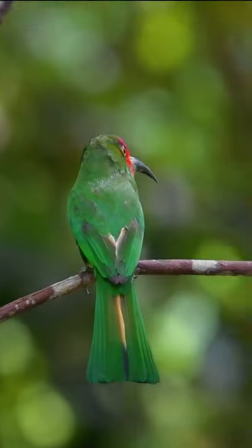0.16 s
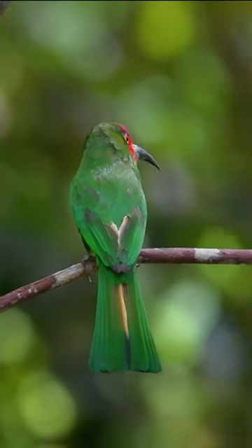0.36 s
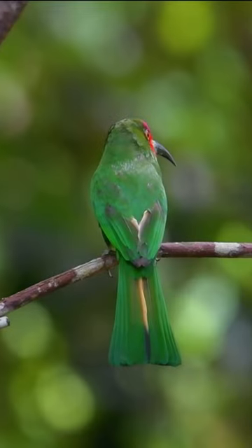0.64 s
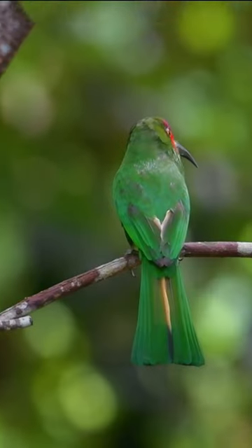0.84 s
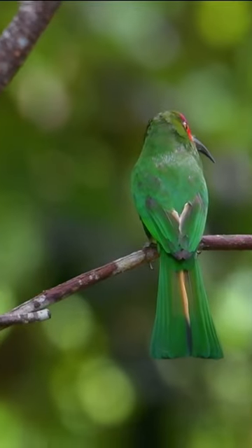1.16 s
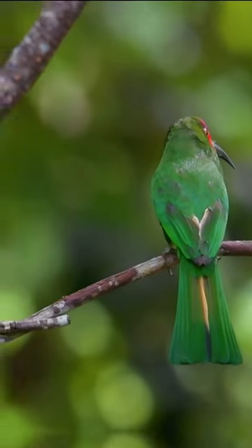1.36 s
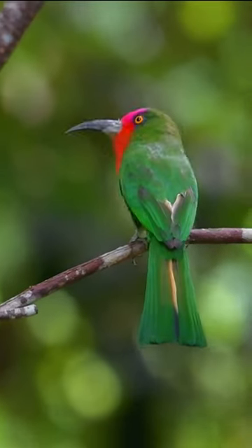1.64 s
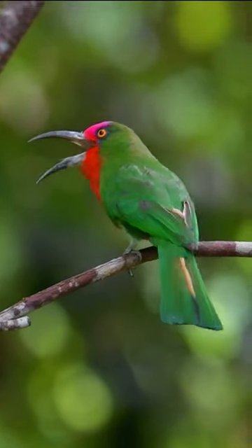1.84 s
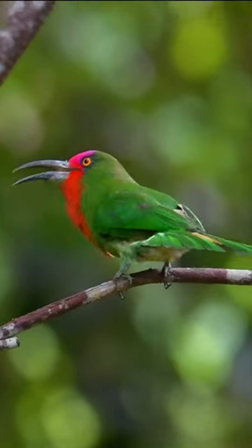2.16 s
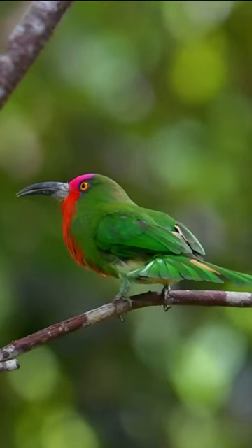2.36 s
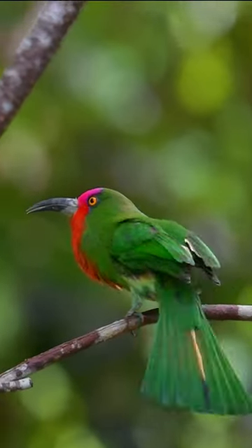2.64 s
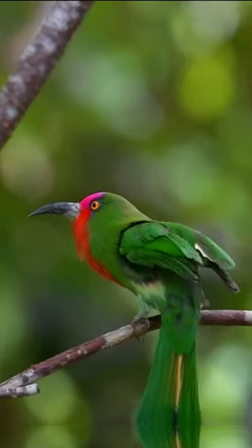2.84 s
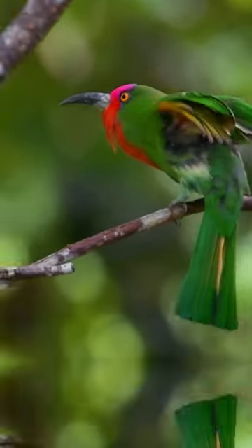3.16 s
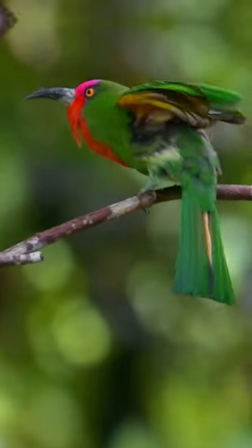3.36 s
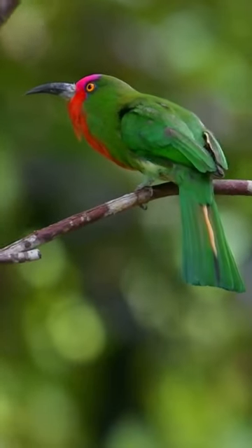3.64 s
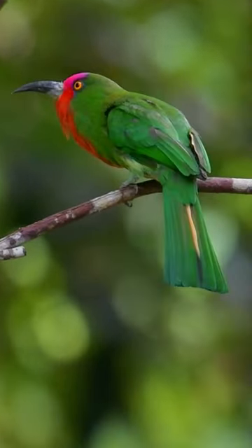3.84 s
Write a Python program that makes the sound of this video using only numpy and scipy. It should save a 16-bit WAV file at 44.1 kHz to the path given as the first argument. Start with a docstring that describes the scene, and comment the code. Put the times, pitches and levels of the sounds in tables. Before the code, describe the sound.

Silence until 0.24 s, then cicada hiss and a thin, phrased whine start abruptly, with rapid high cricket chirps over faint low rumble. An insect buzz swells around 1.5 s, fading by 2.3. From 1.87 to 2.38 s a close bird rattles six harsh, dry notes, falling and dulling, then three low purring croaks trailing off by 2.8. Soft hollow knock at 3.0; insects continue to the end.

```python
"""Out of a short silence, cicadas cut in at full level: bands of hiss plus one nearer, narrow whine in phrases.
A low rumble lies beneath, a cricket chirps as swept sine tones, and a comb of sines makes a passing insect buzz.
A bee-eater on a forest branch rattles six dry, falling notes that darken as its bill closes, then three low
purring croaks, the last with a long fading tail: pulses ringing throat resonances, with forest echoes. The
cricket's upper sideband enters as a thin noise tone, and a small knock is two damped sines. Two narrow notches
hollow out the mix."""
import sys
import numpy as np
from scipy import signal
from scipy.fft import rfft, irfft, next_fast_len
from scipy.io import wavfile
from scipy.ndimage import uniform_filter1d, map_coordinates

SR = 44100
rng = np.random.default_rng(int(sys.argv[2]) if len(sys.argv) > 2 else 0)


def put_to_file(sound):
    """Save the sound as 16-bit audio at rate SR, in the file named by the first command-line argument."""
    columns = np.atleast_2d(sound).T  # one column per channel
    safe = np.clip(columns, -1, 1)
    whole_steps = np.round(safe * 32767)
    wavfile.write(sys.argv[1], SR, whole_steps.astype(np.int16))


N = 176400


def amp(db):
    """Decibels to linear gain."""
    return 10 ** (np.asarray(db) / 20)


def unit(x):
    """Scale a signal to rms 1."""
    return x / np.sqrt(np.mean(x ** 2) + 1e-20)


def along(points, hz):
    """Read (Hz, value) points at any frequency, on a log frequency axis."""
    point_hz, values = np.transpose(points)
    return np.interp(np.log(hz + 1), np.log(point_hz + 1), values)


def curve(rows):
    """Draw an automation curve through (s, value) points, one value per sample."""
    return np.interp(np.arange(N) / SR, *np.transpose(rows))


def wobble(rate):
    """Smooth random modulation: a spline through random knots, rate knots a second."""
    knots = rng.standard_normal(int(N * rate / SR) + 4)
    return map_coordinates(knots, [np.arange(N) * rate / SR])


def filtered(x, response):
    """Shape a sound's spectrum with a response that is a function of frequency."""
    m = next_fast_len(N + SR // 2)
    return irfft(rfft(x, m) * response(np.fft.rfftfreq(m, 1 / SR)), m)[..., :N]


def pan(db):
    """Left and right gains for a level difference; positive leans left."""
    return amp(np.array([[db], [-db]]) / 2)


def add(track, s, sound):
    """Mix a sound into a track at a time in seconds."""
    i = round(s * SR)
    track[i:i + len(sound)] += sound


def noise(spectrum):
    """Two unrelated noises of one colour, silent outside the range of its (Hz, dB) points."""
    def colour(hz):
        inside = (hz > spectrum[0][0]) & (hz < spectrum[-1][0])
        return amp(along(spectrum, hz)) * inside
    return unit(filtered(rng.standard_normal((2, N)), colour))


def stereo(pair, alike):
    """Blend two unrelated signals to a left-right likeness that varies with frequency."""
    def mid_side_gains(hz):
        turn = np.arccos(np.clip(along(alike, hz), -1, 1)) / 2
        return np.array([np.cos(turn), np.sin(turn)])
    mid, side = filtered(pair, mid_side_gains)
    return np.array([mid + side, mid - side])


def forest(x):
    """Diffuse echo of the trees: noise decaying at its own pace in each band, different at each ear."""
    # decay time by frequency: frequency_hz, t60_s
    decay_times = [(300, 0.61), (1000, 0.27), (3300, 0.7), (7000, 0.52), (12000, 0.45)]
    hz, t, grains = signal.stft(rng.standard_normal((2, SR)), SR, nperseg=256)
    decay = amp(-60 * t / along(decay_times, hz)[:, None])
    onset = 1 - np.exp(-t / 0.004)
    tail = signal.istft(grains * decay * onset, SR, nperseg=256)[1]
    return signal.fftconvolve(x[None], tail / np.linalg.norm(tail[0]), axes=1)[:, :N]


def trunks(x, count=14):
    """Early copies from nearby branches and trunks, 1 to 18 ms late and of random sign."""
    taps = np.zeros((2, SR // 10))
    for side in taps:
        delays = (rng.uniform(.001, .018, count) * SR).astype(int)
        side[delays] = rng.choice([-1, 1], count)
    return signal.fftconvolve(x[None], taps / np.linalg.norm(taps, axis=1, keepdims=True), axes=1)[:, :N]


def cicadas():
    """Two fluttering hiss bands of chorus, one nearer singer and thin noise tones."""
    # chorus spectra: frequency_hz, relative_level_db
    low_spectrum = [(4900, -33), (5250, -11.5), (5520, -1), (5800, 4), (6050, -6), (6300, -6.5),
                    (6600, -36)]
    high_spectrum = [(6000, -36), (6400, -12.5), (6800, -1.5), (7050, 2), (7300, -4.5), (7900, -14),
                     (8450, -12), (9000, -25), (9900, -27.5), (11000, -38), (13000, -49), (14100, -26),
                     (15000, -44)]
    # thin tones, the cricket's lower sideband near 4050 Hz, then far insects: pitch_hz, width_hz, level_db
    thin_tones = [(4050, 69, -74.5), (5514, 40, -64.5), (6085, 25, -62), (8070, 46, -68), (8447, 110, -67),
                  (8800, 60, -74), (9160, 43, -75)]
    low_db, high_db, flutter_db = -55, -49, 1
    low = amp(low_db + flutter_db * wobble(250)) * noise(low_spectrum)
    high = amp(high_db + flutter_db * wobble(300) + 0.47 * wobble(2.84)) * noise(high_spectrum)
    tones = np.zeros((2, N))
    for hz, width, db in thin_tones:
        tone = noise([(hz - 2 * width, -30), (hz, 0), (hz + 2 * width, -30)])
        tones += amp(db + 0.81 * wobble(2.41)) * tone
    return low * pan(db=-4.5) + high * pan(db=1.0) + near_cicada() + tones * pan(db=-7.5)


def near_cicada():
    """A narrow, rough whine of noise on a carrier; every phrase scoops up to its pitch, holds and fades."""
    # phrases: start_s, end_s, level_db
    phrases = [(-.2, 1.106, -52.5), (1.638, 3.1, -52.5), (3.42, 4.4, -51.5)]
    pitch_hz, width_hz = 5856, 90
    scoop_hz, scoop_s, fade_s = 341.1, 0.15, 0.21
    t = np.arange(N) / SR
    out = np.zeros((2, N))
    for start, end, db in phrases:
        hz = pitch_hz - scoop_hz * np.exp(-np.maximum(t - start, 0) / scoop_s)
        phase = 2 * np.pi * np.cumsum(hz) / SR
        # slow noises on cosine and sine make a narrow band around the gliding pitch
        white = rng.standard_normal((2, 2, N))
        a, b = unit(filtered(white, lambda f: 1 / (1 + (f / width_hz) ** 2)))
        swell = np.clip(np.minimum(t - start, end - t) / fade_s, 0, 1)
        out += amp(db) * swell * (a * np.cos(phase) + b * np.sin(phase))
    return out * pan(db=-3.5)


def air():
    """Distant rumble, nearly mono in the bass, and faint forest hiss, both filtered noise."""
    # rumble spectrum: frequency_hz, relative_level_db
    rumble_spectrum = [(15, -35), (25, -29), (62, -7), (104, -3.5), (218, -9.5), (300, -11), (421, -17),
                       (2210, -26), (2620, -35.5), (2970, -25), (3600, -28.5), (4000, -25.5), (5200, -23.5),
                       (8800, -120)]
    # stereo image of the rumble: frequency_hz, left_right_likeness
    likeness = [(60, 0.98), (250, 0.69), (1000, 0.12), (4000, 0.067)]
    rumble = unit(stereo(noise(rumble_spectrum), likeness))
    hiss = noise([(2800, -12.0), (3500, 1.0), (5000, 10), (6500, -18)])
    return amp(-58 + wobble(7.01)) * rumble + amp(-65) * hiss


def cricket():
    """Pure tones in runs of evenly spaced, slightly falling chirps, blurred by the trees."""
    # runs of chirps: first_s, last_s, count, first_relative_db, last_relative_db
    runs = [(.244, .469, 5, -55, -52.5), (.522, .606, 3, -51, -54.5), (.655, .765, 3, -55.5, -53),
            (.812, 1.006, 5, -54, -58.5), (1.085, 1.172, 2, -62, -62), (2.225, 2.336, 3, -58, -56),
            (2.372, 2.445, 3, -52, -55), (2.495, 2.696, 6, -54, -54), (2.738, 3.062, 9, -50, -50.5),
            (3.116, 3.501, 10, -50.5, -52), (3.543, 3.721, 5, -55, -57), (3.78, 3.99, 5, -55, -56.5)]
    pitch_hz, wander_hz, glide_hz = 4556, 6.9, 25  # wander from chirp to chirp, fall within each
    trim_db, uneven_db, echo_db = 4.5, 0.66, -10
    overlap = 1.15  # chirp length over spacing
    out = np.zeros(N + SR)
    for first, last, count, first_db, last_db in runs:
        length = overlap * (last - first) / (count - 1)
        u = np.linspace(0, 1, int(length * SR))  # progress through a chirp
        swell = np.sin(np.pi * u) ** 1.12
        for s, db in zip(np.linspace(first, last, count), np.linspace(first_db, last_db, count)):
            hz = pitch_hz + wander_hz * rng.standard_normal() + glide_hz * (.5 - u)
            tone = np.sin(2 * np.pi * (np.cumsum(hz) / SR + rng.random()))
            level = amp(db + trim_db + uneven_db * rng.standard_normal())
            add(out, s - length / 2, level * swell * tone)
    chirps = out[:N]
    return pan(db=-6.0) * (chirps + amp(echo_db) * forest(chirps))


def buzzer():
    """An insect's fast regular buzz: a comb of sines that swells and fades; echoes scatter their phases."""
    # loudness curve: time_s, level_db
    loudness = [(.92, -78), (1.05, -66), (1.25, -61), (1.5, -55.5), (1.64, -57), (1.74, -64), (1.85, -61),
                (2.1, -62), (2.35, -76)]
    # lines of the comb from the lowest up: relative_level_db
    lines_db = [-12, -14, -13, 0, -2, -1, -5, -3, -4]
    lowest_hz, rate_hz = 3910, 126
    warped_t = np.cumsum(1 + 0.000376 * wobble(7.7)) / SR  # slight pitch drift
    comb = np.zeros((2, N))
    for k, db in enumerate(lines_db):
        hz = lowest_hz + rate_hz * k
        comb += amp(db) * np.sin(2 * np.pi * (hz * warped_t + 0.16 * rng.standard_normal((2, 1))))
    sounding = (warped_t > loudness[0][0]) * (warped_t < loudness[-1][0])
    return amp(curve(loudness)) * unit(comb) * sounding


def pulses(length, rate, shape_db, resonances, fall, quickening, rasp):
    """Syrinx pulses ring the sinking resonances; they share one rasp, with a little new roughness in each."""
    fall_below_hz, rasp_hz = 3040, 3670  # resonances above these sink less; are rougher
    resonance_scatter, jitter, scatter_db = 0.017, .02, 0.5  # from pulse to pulse
    fresh_share, rise_s = .45, .0012
    t = np.arange(SR // 30) / SR
    out = np.zeros(int((length + .1) * SR) + len(t))
    hz, width, db = np.transpose(resonances)[:, :, None]
    sink = fall / (1 + (hz / fall_below_hz) ** 2)
    envelope = np.exp(-np.pi * width * t) * (1 - np.exp(-t / rise_s))

    def walk():
        """Random phase drift, faster for wider resonances."""
        steps = uniform_filter1d(rng.standard_normal((len(hz), len(t))), size=24, axis=1)
        return np.cumsum(steps, axis=1) * np.sqrt(2 * np.pi * width / SR)

    shared = walk() + rng.standard_normal(hz.shape)
    s = 0
    while s < length:
        detune = 1 + resonance_scatter * rng.standard_normal(hz.shape)
        centre = hz * np.exp(-sink * (s - length / 2)) * detune
        drift = np.sqrt(1 - fresh_share) * shared + np.sqrt(fresh_share) * walk()
        roughness = 2 * rasp * centre / np.hypot(centre, rasp_hz)
        ring = np.sin(2 * np.pi * centre * t + roughness * drift) * envelope
        ring *= amp(db) / np.linalg.norm(ring, axis=1, keepdims=True)
        size = amp(np.interp(s / length, *np.transpose(shape_db)) + scatter_db * rng.standard_normal())
        add(out, s, size * ring.sum(0))
        period = np.exp(-quickening * s) / rate
        s += period * (1 + jitter * np.clip(rng.standard_normal(), -2, 2))
    return out / np.sqrt(np.sum(out ** 2) / (length * SR))


def bird():
    """Rattle notes with the bill open, then croaks with it closed, each a run of pulses in a resonant throat."""
    # rattle notes: start_s, length_s, level_db, pulses_per_s, low_hz, middle_hz, high_hz (resonances),
    # middle_db, high_db, treble_db (levels against the low resonance)
    notes = [(1.8735, 0.044, -35.5, 180, 1180, 1950, 3450, -1.5, 9.5, 0.5),
             (1.9780, 0.04, -35.5, 185, 1070, 1920, 3300, 2.5, 9.5, -1.5),
             (2.08, 0.04, -38.5, 165, 967, 1870, 3207, 2, 9.5, -1),
             (2.181, 0.036, -41, 157, 894, 1720, 2950, 4.5, 7.5, -1),
             (2.2765, 0.0305, -42, 143, 855, 1614, 2160, 5, 11, -6.5),
             (2.3738, 0.0064, -43.5, 149, 725, 1270, 1840, 1.5, -6, -25)]
    # the low, middle and high resonance: width_hz
    widths = [200, 190, 180]
    # upper resonances: frequency_hz, width_hz, level_db (before each note's treble_db)
    treble = [(4090, 680, 0), (5020, 250, -1.5), (6480, 250, -4.5), (9060, 480, -18), (10450, 390, -17)]
    # three croaks, the last row being the third's fading tail: start_s, length_s, level_db, pulses_per_s,
    # fade_db, relative_fall_per_s, upper_resonances_db
    croaks = [(2.379, 0.029, -52, 135, 0, 4.5, -3.5), (2.471, 0.067, -51.5, 123, -2, 1.7, -0.5),
              (2.605, 0.085, -52, 118, -4, 1, -1.5), (2.694, 0.13, -58.5, 110, -9, .6, 0.5)]
    # throat with the bill closed: frequency_hz, width_hz, level_db (upper ones before upper_resonances_db)
    closed = [(633, 98, 1), (968, 99, -0.5), (1206, 56, -8), (1580, 130, -16)]
    fall_per_s, quickening_per_s = 5.8, 3  # relative, of resonances and of pulse rate within a note
    note_shape = [(0, -6.5), (0.29, 0), (1, -5)]  # (share of the note, dB)
    out = np.zeros(N)
    for s, length, db, rate, low, middle, high, middle_db, high_db, treble_db in notes:
        throat = list(zip((low, middle, high), widths, (0, middle_db, high_db)))
        throat += [(hz, width, level + treble_db) for hz, width, level in treble]
        note = pulses(length, rate, note_shape, throat, fall_per_s, quickening_per_s, rasp=1)
        add(out, s, amp(db) * note)
    for s, length, db, rate, fade_db, fall, upper_db in croaks:
        throat = list(closed[:1]) + [(hz, width, level + upper_db) for hz, width, level in closed[1:]]
        purr = pulses(length, rate, [(0, 0.01), (1, fade_db)], throat, fall, quickening=0, rasp=.6)
        add(out, s, amp(db) * purr)
    return signal.sosfilt(signal.butter(4, [520, 12100], "band", fs=SR, output="sos"), out)


def upper_sideband():
    """Thin noise tone about 500 Hz above the cricket's pitch, a sideband of its chirping, fading in."""
    pitch_hz, reach_hz, level_db = 5060, 71, -65.5
    start_s, rise_s = 2.07, 0.28
    swell = np.clip((np.arange(N) / SR - start_s) / rise_s, 0, 1)
    tone = noise([(pitch_hz - reach_hz, -30), (pitch_hz, 0), (pitch_hz + reach_hz, -30)])
    return amp(level_db) * swell * tone * pan(db=-3)


def knock():
    """One soft, hollow knock as the bird shifts on its perch: damped sines with a soft attack."""
    # modes: pitch_hz, relative_level_db, t60_s
    modes = [(459, 1.5, 0.028), (1074, 2.5, 0.019)]
    start_s, level_db, rise_s = 3.019, -33.5, 0.0045
    out, t = np.zeros(N), np.arange(SR // 10) / SR
    ring = sum(amp(db - 60 * t / t60) * np.sin(2 * np.pi * hz * t) for hz, db, t60 in modes)
    add(out, start_s, amp(level_db) * ring * (1 - np.exp(-(t / rise_s) ** 2)))
    return out


def scene():
    """The near bird with its echoes, amid the insects."""
    # stereo image of the bird's echoes: frequency_hz, left_right_likeness
    likeness = [(600, 0.89), (1500, 0.51), (3000, 0), (8000, 0.69)]
    insects = cicadas() + cricket() + buzzer() + upper_sideband()
    call = bird()
    echoes = stereo(amp(-2.5) * forest(call) + amp(-9.5) * trunks(call), likeness)
    tap = knock()
    near = call + echoes + tap + amp(-13) * forest(tap)
    return insects + air() + pan(db=-0.8) * near


def record(dry):
    """Two notch filters, an abrupt start and a steep treble limit."""
    # notches: frequency_hz, half_width_hz
    notches = [(2630, 134), (7700, 140)]
    start_s, top_hz = 0.2381, 15100

    def notch_gain(f):
        return np.prod([(f - hz) ** 2 / ((f - hz) ** 2 + w ** 2) for hz, w in notches], axis=0)

    started = np.arange(N) / SR > start_s
    return filtered(filtered(dry, notch_gain) * started, lambda hz: hz < top_hz)


dry = scene()
out = record(dry)
put_to_file(out)
```